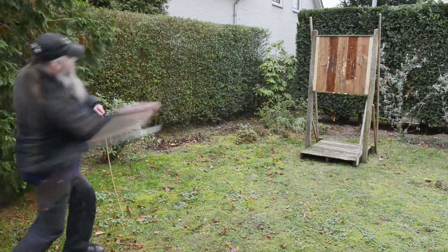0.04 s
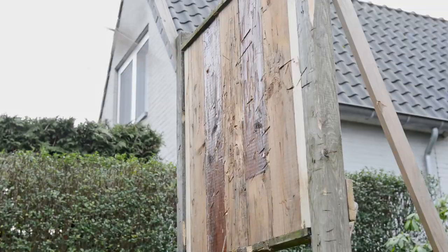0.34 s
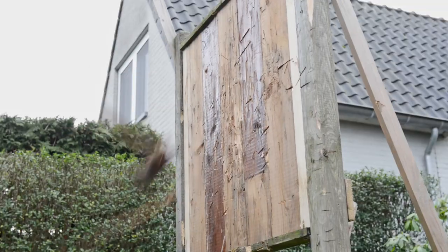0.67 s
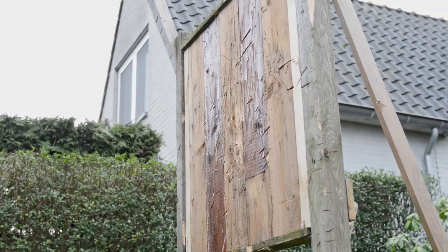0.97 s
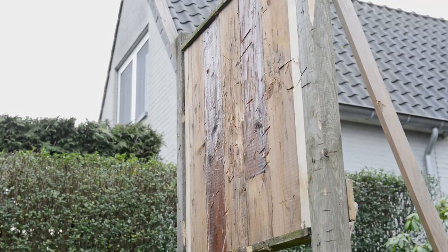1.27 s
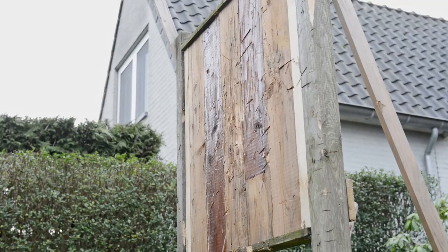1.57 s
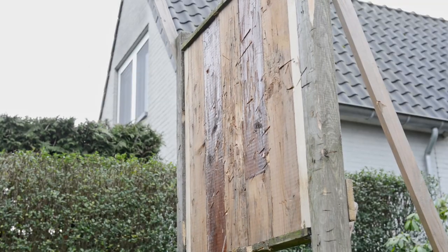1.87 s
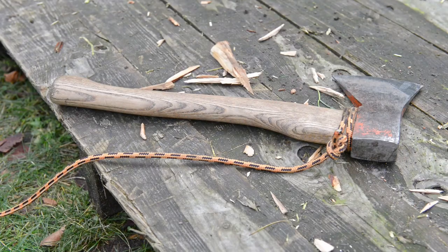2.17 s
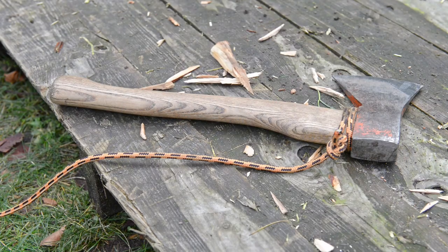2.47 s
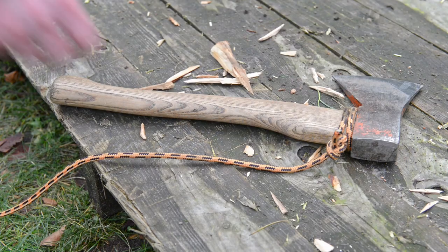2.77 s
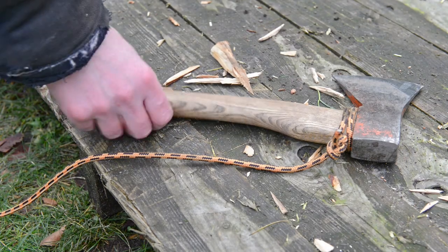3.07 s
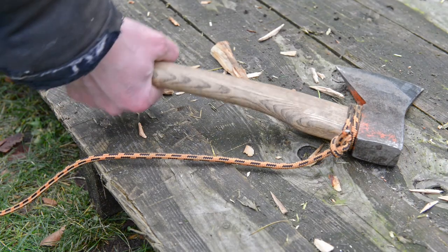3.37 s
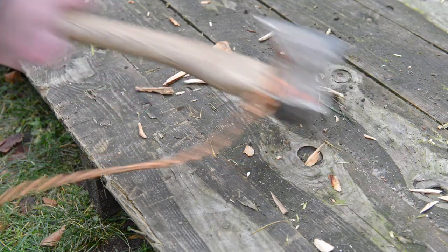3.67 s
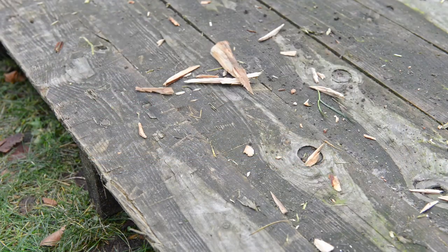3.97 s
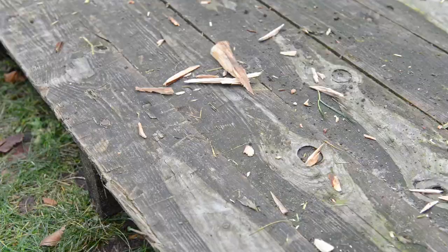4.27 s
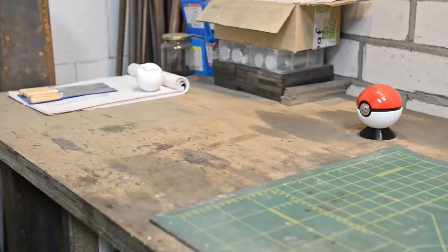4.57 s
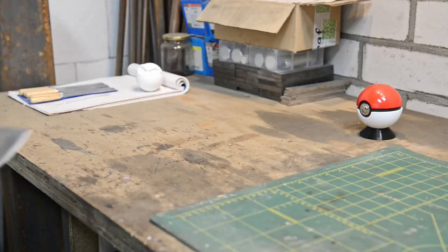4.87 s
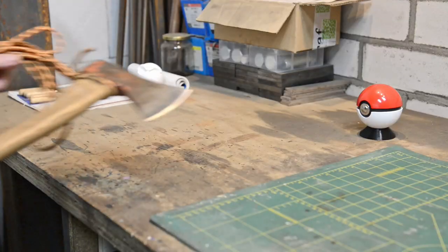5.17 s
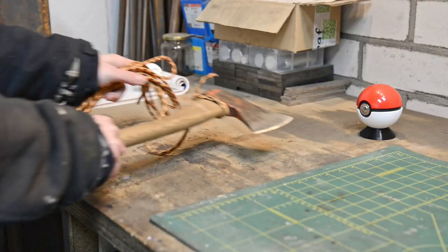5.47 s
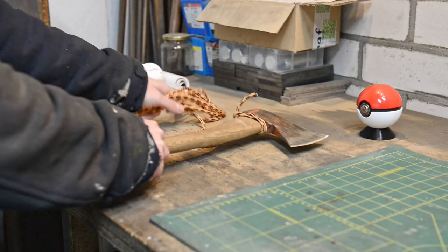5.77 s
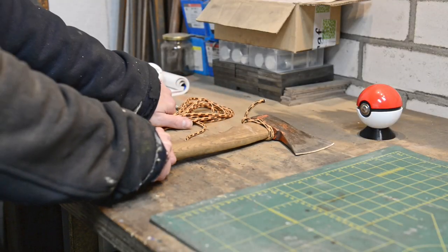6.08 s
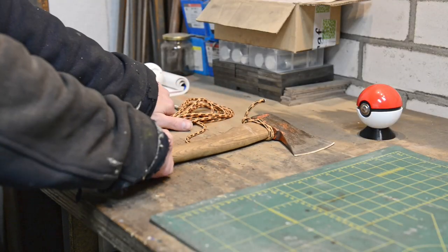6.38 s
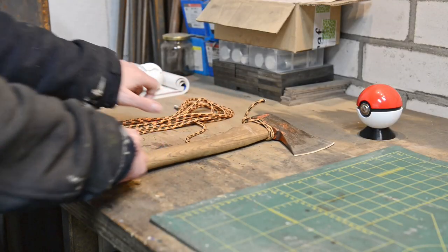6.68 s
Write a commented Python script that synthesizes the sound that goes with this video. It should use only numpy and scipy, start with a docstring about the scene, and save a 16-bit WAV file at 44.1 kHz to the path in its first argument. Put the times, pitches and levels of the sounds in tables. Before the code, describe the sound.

In a quiet garden, a thrown axe hits a plank target with a loud, close, splitting crack and a brief metallic ring. It works loose and thuds to the ground among dry leaves. Faint birds call while the axe scrapes softly off a wooden deck, with sleeve and rope rustling. Then, in a small ringing workshop, the steel head thumps onto a bench and the handle knocks down after it.

```python
"""Throwing an axe

A thrown axe splits its way into a plank target in a garden, works loose and thuds to the ground.
It scrapes on a wooden deck as it is picked up while birds call, then is set down hard on a workshop
bench: the steel head lands first, the handle knocks down after it and the small room rings.
Sleeve and rope rustle with each movement, and each place has its own quiet background."""
import sys
import numpy as np
from scipy import signal
from scipy.fft import rfft, irfft
from scipy.io import wavfile

SR = 44100
rng = np.random.default_rng(int(sys.argv[2]) if len(sys.argv) > 2 else 0)


def pcm_store(signal):
    """Save signal as 16-bit PCM."""
    levels = np.round(np.clip(np.atleast_2d(signal), -1, 1) * 32767)
    wavfile.write(sys.argv[1], SR, levels.astype(np.int16).T)


N = 297234
TIME = np.arange(N) / SR
AGE = TIME[:SR]  # seconds since a blow


def amp(db):
    """Turns decibels into a gain."""
    return 10 ** (np.asarray(db) / 20)


def unit_level(x):
    """Scales a signal to an average (rms) level of 1."""
    return x / np.sqrt(np.mean(x ** 2) + 1e-20)


def curve(hz, points_hz, values):
    """Joins points with straight lines on a scale of octaves."""
    return np.interp(np.log(hz + 1), np.log(np.asarray(points_hz) + 1), values)


def add(mix, start_s, sound):
    """Mixes a sound in at its start time."""
    part = mix[round(start_s * SR):][:len(sound)]
    part += sound[:len(part)]


def fade(fade_s, hold_s=0):
    """Holds steady, then falls 60 dB in fade_s."""
    return np.exp(-np.log(1000) * np.maximum(AGE - hold_s, 0) / fade_s)


def onset(rise_s):
    """Swells from silence to full level."""
    return 1 - np.exp(-AGE / rise_s)


def swells(strokes):
    """Loudness of smooth strokes that speed up and slow down again."""
    power = sum(amp(2 * db) * np.exp(-((TIME - middle_s) / half_s) ** 2)
                for middle_s, half_s, db in strokes)
    return np.sqrt(power)


def noise(colour, size=N, tilt_db=0):
    """Noise of level 1; colour sets how strong each pitch is, and tilt_db is added per octave."""
    hz = np.fft.rfftfreq(size, 1 / SR)
    shape_db = curve(hz, *np.transpose(colour)[:2]) + tilt_db * np.log2(hz + 1)
    spectrum = rfft(rng.standard_normal(size)) * amp(shape_db) * (hz > 20)
    return unit_level(irfft(spectrum, size))


def drift(fastest_hz):
    """A random wander of level 1."""
    coarse = TIME[::32]
    slow_enough = np.fft.rfftfreq(len(coarse), coarse[1]) < fastest_hz
    spectrum = rfft(rng.standard_normal(len(coarse))) * slow_enough
    return unit_level(np.interp(TIME, coarse, irfft(spectrum, len(coarse))))


def ring(tones, rise_s):
    """Fading tones of a struck object; neighbours swing in opposite directions."""
    return onset(rise_s) * sum((-1) ** k * amp(db) * fade(fade_s) * np.sin(2 * np.pi * hz * AGE)
                               for k, (hz, db, fade_s) in enumerate(tones))


def noisy_ring(bands, rise_s, hold_s=0):
    """Countless tones or echoes blur into noise; each band fades at its own speed."""
    centres_hz, _, fades_s = np.transpose(bands)
    spectrum = rfft(noise(bands, size=SR))
    hz = np.fft.rfftfreq(SR, 1 / SR)
    parts = (irfft(spectrum * curve(hz, centres_hz, share), SR) * fade(fade_s, hold_s)
             for share, fade_s in zip(np.eye(len(bands)), fades_s))
    return sum(parts) * onset(rise_s)


# wood fibres giving way: start_s, level_db
FIBRE_SNAPS = [(0.4385, -18.5), (0.4397, -5.5), (0.441, -9), (0.443, -20.5), (0.4432, -15.5),
               (0.445, -10.5), (0.4473, -21)]
# the noise of splitting wood: pitch_hz, relative_db, fade_s
SPLIT_BANDS = [(200, -4, 0.039), (700, -1.5, 0.028), (982, -7.5, 0.036), (1774, 0.5, 0.01), (3700, 3, .009),
               (4850, -14, 0.0068), (6246, -8.5, 0.012), (10000, -11, 0.0072), (15200, -28.5, 0.011)]
# the short, bright ring of the struck plank: pitch_hz, relative_db, fade_s
PLANK_TONES = [(1123, -24.5, 0.055), (1284, -28.5, 0.062), (1716, -6.5, 0.015), (1930, -16.5, 0.031),
               (2014, -21.5, 0.051), (2530, -26, 0.053), (2790, -16, 0.03595), (3393, -18.5, 0.0308),
               (3470, -24, 0.043), (3766, -11, 0.036), (4080, -22, 0.044), (4266, -26, .03),
               (5780, -22, 0.021), (6340, -19, 0.026), (7060, -28.5, 0.039), (7600, -22, 0.025),
               (8370, -27.5, 0.043), (8770, -28.5, 0.024)]
# the low ring of the whole board on its stand: pitch_hz, level_db, fade_s
BOARD_TONES = [(64.7, -35.5, 0.37), (159.1, -22, 0.22), (235, -33, .3), (299, -27, 0.37),
               (323.4, -28.5, 0.33), (365.8, -19.5, 0.083), (436.6, -29, 0.11), (481, -19.5, 0.068),
               (667, -18.5, 0.066), (738, -30, 0.092)]
# single echoes from walls and hedges: delay_s, relative_db
ECHOES = [(.083, -33), (.161, -39.5), (.256, -44.5)]
# the wash of sound scattered by the garden: pitch_hz, relative_db, fade_s
GARDEN_BANDS = [(30, -19.5, .5), (109.8, -1.5, .6), (330, 3.5, .5), (700, -5, 0.31), (995, -3.5, 0.19),
                (1792, -5.5, .38), (2974, -12, 0.45), (4995, -13, 0.22), (7480, -17, .27),
                (11000, -26.5, .25), (15680, -34.5, .22)]


def target_hit():
    """The blade splits fibres for a few milliseconds, then stops and shoves the whole board."""
    out = np.zeros(N)
    bite_s, stop_s = 0.4392, 0.4435
    click = signal.lfilter(*signal.butter(1, [1500, 7000], "band", fs=SR), signal.unit_impulse(SR))
    for start_s, db in FIBRE_SNAPS:
        add(out, start_s, amp(db) * noisy_ring(SPLIT_BANDS, rise_s=0.0001))
        add(out, start_s + 0.0003, amp(db + 13) * click)  # the sharp front of the snap
    add(out, bite_s, amp(-0.5) * ring(PLANK_TONES, rise_s=0.00054))
    add(out, stop_s, ring(BOARD_TONES, rise_s=0.001))
    # an open board gives off little deep bass
    out = signal.sosfilt(signal.butter(2, 60, "high", fs=SR, output="sos"), out)
    dulled = signal.lfilter(*signal.butter(1, 3000, fs=SR), out)
    for delay_s, db in ECHOES:
        add(out, delay_s, amp(db) * dulled)
    clumps = amp(2.5 * drift(300)[:SR])  # flying splinters and debris make the tail grainy
    add(out, bite_s, amp(-28.5) * clumps * noisy_ring(GARDEN_BANDS, rise_s=0.0044))
    return out


# the bench top booming under the axe head: pitch_hz, relative_db, fade_s
BENCH_TONES = [(74, -22, .36), (120, -28, .2), (161, -17, .33), (184, -14, .38), (221, -21, .3),
               (255, -22, .38), (278, -15, .28), (326, -18, .3), (420, -16, .22), (454, -16, .22),
               (478, -20, .2), (702, -21, .18), (777, -27, .17)]
# the head's dull smack, and the room's answer: pitch_hz, relative_db, fade_s
SMACK_BANDS = [(30, -39.5, .2), (89, -33, 0.17), (180, 3, 0.16), (432, 4.5, 0.19), (608, -7, 0.16),
               (705, -1, 0.064), (950, -9.5, 0.16), (2250, -14.5, 0.084), (4170, -30.5, 0.099),
               (8400, -34.5, 0.067), (15500, -50, .06)]
SMACK_ROOM_BANDS = [(35, -26, 0.36), (172, 3.5, 0.9), (426, -0.5, 0.63), (610, -8.5, 0.52),
                    (700, -1.5, 0.51), (830, -14.5, 0.59), (1320, -13.5, 0.49), (2230, -26, 0.46),
                    (4640, -39.5, 0.6), (8500, -42, 0.5), (15500, -61, 0.27)]
# the handle knocking on the bench: pitch_hz, level_db, fade_s
KNOCK_TONES = [(248, -31.5, 0.22), (330, -31.5, 0.26), (640, -42.5, 0.46), (900, -44.5, 0.51),
               (1176, -29, 0.1), (1310, -47, 0.24), (1464, -29, 0.08), (1604, -45, 0.54),
               (1560, -28, 0.055), (1860, -33, 0.043), (2350, -47, 0.075), (2660, -50, 0.056)]
# the room's answer to the knock: pitch_hz, relative_db, fade_s
KNOCK_ROOM_BANDS = [(89, -19, 0.38), (308, 3, 0.6), (440, -7.5, 0.56), (1120, -9, 0.42), (1290, -2, 0.54),
                    (1360, -13, 0.62), (1500, -3.5, 0.55), (1650, -15.5, 0.6), (3500, -34.5, 0.34),
                    (8000, -66, .2)]


def bench_hit():
    """The head thumps the bench top, the handle follows, and the small room rings."""
    out = np.zeros(N)
    head_s, handle_s, build_cycles = 5.9338, 6.2375, 2.5
    # each tone needs a few swings to build up, so the boom follows the smack
    for k, (hz, db, fade_s) in enumerate(BENCH_TONES):
        boom = ring([(hz, db, fade_s)], rise_s=build_cycles / hz)
        add(out, head_s, (-1) ** k * amp(-1) * boom)
    add(out, head_s, amp(-14.5) * noisy_ring(SMACK_BANDS, rise_s=0.00075, hold_s=0.0025))
    add(out, head_s, amp(-21.5) * noisy_ring(SMACK_ROOM_BANDS, rise_s=0.02, hold_s=0.046))
    add(out, handle_s, ring(KNOCK_TONES, rise_s=0.0011))
    add(out, handle_s, amp(-31.5) * noisy_ring(KNOCK_ROOM_BANDS, rise_s=0.0027, hold_s=0.0055))
    return out


# the axe bouncing on the ground: start_s, level_db, pitch_hz
THUDS = [(1.02, -27.5, 166.3), (1.028, -25.5, 98.5), (1.052, -38, 213), (1.094, -40, 163), (1.154, -37, 87),
         (1.204, -45, 173)]


def ground_thuds():
    """Each bounce of the fallen axe makes one low, short tone."""
    out = np.zeros(N)
    for start_s, db, hz in THUDS:
        add(out, start_s, ring([(hz, db, 0.11)], rise_s=0.00097))
    return out


# blows that set the axe ringing: start_s, handle_db, steel_db, clink_db
AXE_BLOWS = [(.445, -28, -45, -49), (1.048, -64, -66, -49.5), (1.082, -48, -70, -72),
             (1.123, -49, -76, -61), (1.252, -61, -78, -68)]
# the handle's note, the head's long ring and its short clink: pitch_hz, relative_db, fade_s
HANDLE_TONES = [(496, 7, .27)]
STEEL_TONES = [(6078, 0, .38), (6097, -3, .36), (6670, -15, .25), (10160, -17, .35)]
CLINK_TONES = [(4050, 0.15, 0.092), (4210, -1.8, 0.068)]


def axe_ring():
    """Handle and head ring when knocked; two steel tones close in pitch make the ring pulse."""
    handle, head = np.zeros(N), np.zeros(N)
    for start_s, handle_db, steel_db, clink_db in AXE_BLOWS:
        add(handle, start_s, amp(handle_db) * ring(HANDLE_TONES, rise_s=0.00199))
        add(head, start_s, amp(steel_db) * ring(STEEL_TONES, rise_s=0.00063))
        add(head, start_s, amp(clink_db) * ring(CLINK_TONES, rise_s=0.0005))
    turning = amp(2.5 * drift(25))  # the ring wavers as the blade turns
    return handle + turning * head


# the axe tapping twigs, deck and bench: start_s, level_db, tilt_db_per_octave
TICKS = [(1.0208, -31, 10.5), (1.0295, -33, .5), (1.038, -44, 8), (1.047, -36, 5), (1.0795, -39, -1.5),
         (2.177, -49, 3.5), (2.846, -41, -2.3), (3.4305, -43, -3), (3.481, -45, -1.5), (3.526, -44.5, -2.5),
         (5.899, -37.5, -1.5), (6.7025, -42.5, -1.5)]
# dry leaves crushed under the falling axe: start_s, level_db
CRUNCHES = [(1.03, -51.5), (1.102, -54.5), (1.253, -58.5), (1.326, -64.5)]
# the noise both are made from: pitch_hz, relative_db
TICK_COLOUR = [(150, -22), (550, 16), (2500, 9.5), (8000, -3.5), (15500, -17.5)]


def ticks_and_crunches():
    """Crushed leaves give bright, grainy bursts; small contacts give dry ticks with a faint tail."""
    out = np.zeros(N)
    crunch_shape = onset(0.00085) * fade(0.19)
    for start_s, db in CRUNCHES:
        grain = amp(4 * drift(300)[:SR])
        add(out, start_s, amp(db) * crunch_shape * grain * noise(TICK_COLOUR, size=SR, tilt_db=6))
    tick_shape = onset(0.0004) * (fade(0.016) + amp(-41) * fade(0.35))
    for start_s, db, tilt_db in TICKS:
        add(out, start_s, amp(db) * tick_shape * noise(TICK_COLOUR, size=SR, tilt_db=tilt_db))
    return out


# shakes of the target's stand: middle_s, half_length_s, level_db
SHUDDERS = [(.74, .15, -52.5), (1.17, .11, -49.5)]
# their low rumble: pitch_hz, relative_db
SHUDDER_COLOUR = [(30, -13), (75, 3), (130, -0.5), (220, -13.5), (350, -17), (700, -42), (3000, -72)]


def stand_shudder():
    """The stand shakes as the axe pulls loose and again as it lands."""
    return swells(SHUDDERS) * noise(SHUDDER_COLOUR)


# the handle dragging and the blade sliding on the deck: middle_s, half_length_s, level_db
HANDLE_DRAGS = [(3.095, .03, -56), (3.19, 0.038, -57.5), (3.52, 0.018, -62)]
BLADE_SLIDES = [(3.09, 0.041, -72), (3.315, 0.018, -65.5)]
# the handle's dull scrape: pitch_hz, relative_db
DRAG_COLOUR = [(60, -4), (130, -1), (280, -1), (420, -15.5), (800, -16), (1500, -33), (6000, -34),
               (15500, -42.5)]


def deck_scrape():
    """As the axe is lifted, its handle drags and its sliding blade sings faintly."""
    drag = swells(HANDLE_DRAGS) * amp(1.8 * drift(60)) * noise(DRAG_COLOUR)
    blade_hz = STEEL_TONES[0][0]
    singing = swells(BLADE_SLIDES) * drift(50) * np.sin(2 * np.pi * blade_hz * TIME)
    return drag + singing


# movements of sleeve and rope: middle_s, half_length_s, hiss_db, swish_db
MOVES = [(.12, 0.1, -64, -63), (.335, .03, -65, -65), (1.971, .06, -72.5, -87), (2.471, 0.11, -66, -65.5),
         (2.76, 0.14, -60, -74), (3.91, .1, -66.5, -63), (4.036, 0.016, -58, -61), (4.3, 0.2, -71.5, -65),
         (4.471, 0.047, -64, -70), (5.16, 0.12, -68, -61.5), (5.55, 0.35, -65, -66.5),
         (5.886, 0.025, -70, -58), (6.22, 0.073, -60, -64)]
# a bright hiss, and a dull rush that the background also uses: pitch_hz, relative_db
HISS_COLOUR = [(300, -12.5), (1800, 1), (4000, -0.5), (7500, 5.5), (11000, -3), (15500, -9.5)]
RUSH_COLOUR = [(150, -21.5), (500, -4.5), (850, 1), (1700, -3.5), (2800, -11), (6000, -25.5),
               (15500, -44.5)]


def rustle():
    """Moving cloth and rope hiss and swish; now and then a fibre catches with a tiny crackle."""
    hiss_level = swells([(middle_s, half_s, db) for middle_s, half_s, db, _ in MOVES])
    swish_level = swells([(middle_s, half_s, db) for middle_s, half_s, _, db in MOVES])
    catches_per_s = 14
    catches = (rng.random(N) < catches_per_s / SR) * amp(rng.uniform(-1, 10, N))
    crackle = signal.fftconvolve(catches, fade(0.0095))[:N]
    flutter = amp(1.3 * drift(70))
    return hiss_level * (flutter + crackle) * noise(HISS_COLOUR) + swish_level * noise(RUSH_COLOUR)


# bird calls: start_s, length_s, start_hz, end_hz, level_db, octave_relative_db
BIRD_NOTES = [(0.206, 0.038, 3000, 4380, -51, 4.5), (2.382, 0.13, 2820, 3080, -65, -20),
              (2.475, 0.08, 7350, 6570, -59.5, -40), (2.938, 0.1, 1700, 1580, -66.5, -12),
              (3.079, 0.075, 1720, 1600, -63, -20), (3.34, 0.12, 1710, 1567, -66, -20)]


def birds():
    """Short, unsteady whistles that glide in pitch, each with a second tone an octave up."""
    out = np.zeros(N)
    waver = 1 + 0.02 * drift(260)
    for start_s, length_s, start_hz, end_hz, db, octave_db in BIRD_NOTES:
        size = round(length_s * SR)
        hz = np.linspace(start_hz, end_hz, size) * waver[round(start_s * SR):][:size]
        phase = 2 * np.pi * np.cumsum(hz) / SR
        whistle = np.sin(phase) + amp(octave_db) * np.sin(2 * phase)
        add(out, start_s, amp(db) * signal.windows.tukey(size, 0.5) * whistle)
    return out


# the background noise of each place: pitch_hz, relative_db
LAWN_AIR = [(18, -28), (30, -7), (177, -3), (315, -10), (369, -5), (420, -8), (467, -11), (996, -6),
            (4420, -16), (8500, -12.5), (15500, -25.5)]
TARGET_AIR = [(15, -54), (25, -25.5), (43, -18.5), (82, -1.5), (113, -8.5), (240, -14), (331, -18.5),
              (399, -19), (684, -20.5), (970, -19), (3090, -35), (3930, -32.5), (4260, -33.5),
              (15500, -43.5)]
DECK_AIR = [(25, -24), (50, -12), (82, -11.5), (144, -12), (246, -18.5), (433, -25), (850, -23.5),
            (1700, -28.5), (2800, -32.5), (4040, -37.5), (7500, -37), (15500, -47.5)]
WORKSHOP_AIR = [(15, -32), (25, 4), (43, -16), (64, -4.5), (107, -7), (136, 0), (183, -1), (289, -9),
                (567, -10.5), (722, -12.5), (826, -15.5), (1110, -16.5), (7500, -23), (15500, -30.5)]
# when the background switches to the target, the deck and the workshop: start_s
PLACE_STARTS = [0.24, 1.93, 4.6]


def background():
    """The air of four places in turn, with a low drone at the deck and a distant rush throughout."""
    drone_level = amp(-56.5 + 0.28 * drift(8.2))
    drone_hz = 81 + 1.35 * drift(8.9)
    drone = drone_level * np.sin(2 * np.pi * np.cumsum(drone_hz) / SR)
    places = [amp(-50) * noise(LAWN_AIR), amp(-57) * noise(TARGET_AIR),
              amp(-59) * noise(DECK_AIR) + drone, amp(-56.5) * noise(WORKSHOP_AIR)]
    air = np.choose(np.searchsorted(PLACE_STARTS, TIME), places)
    rush = amp(-70 + 3.1 * drift(2)) * noise(RUSH_COLOUR)
    return air * amp(0.5 * drift(5)) + rush


def scene():
    """Adds all the sources into one channel."""
    impacts = target_hit() + bench_hit() + ground_thuds() + axe_ring() + ticks_and_crunches()
    handling = stand_shudder() + deck_scrape() + rustle()
    return (impacts + handling + birds() + background())[None]


def record(dry):
    """Gently rounds off the loudest peaks and removes the highest treble."""
    rounded = 1.2 * np.tanh(dry / 1.2)
    treble_cut = signal.firwin(511, 15900, window=("kaiser", 9), fs=SR)
    return signal.oaconvolve(rounded, treble_cut[None], "same")


dry = scene()
out = record(dry)
pcm_store(out)
```